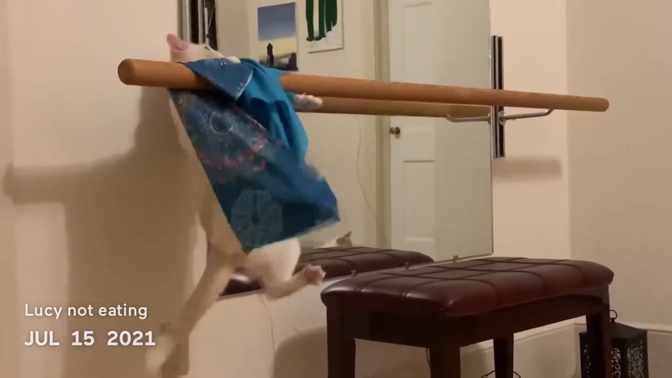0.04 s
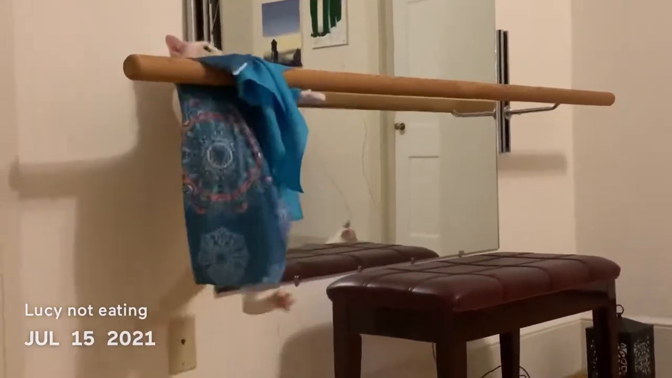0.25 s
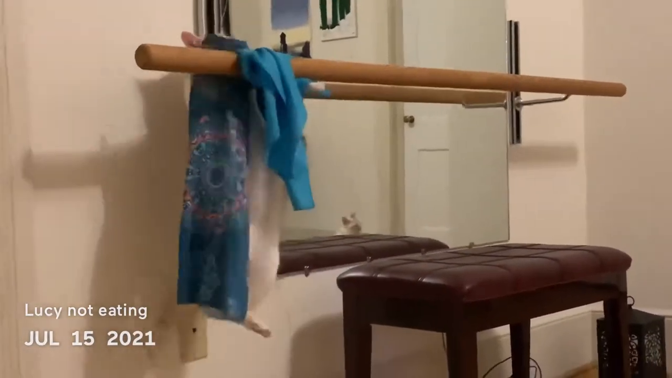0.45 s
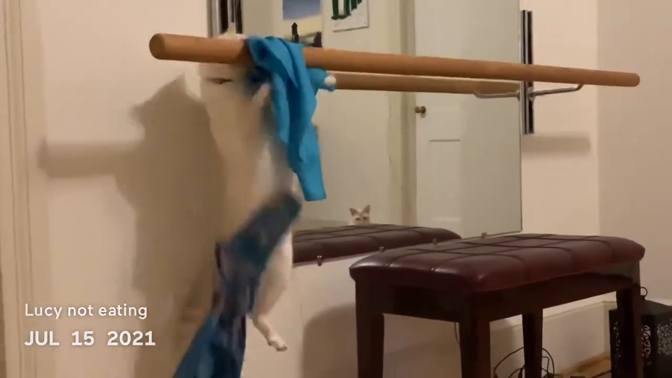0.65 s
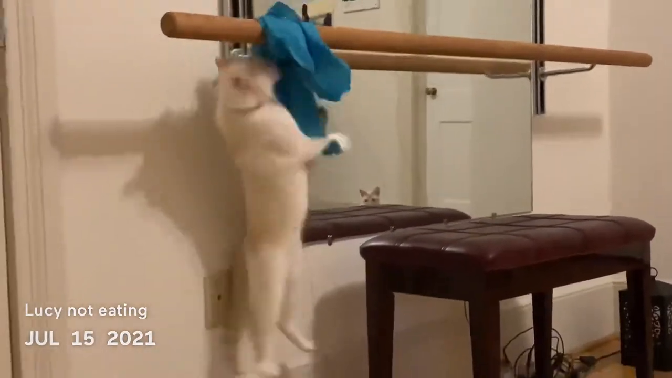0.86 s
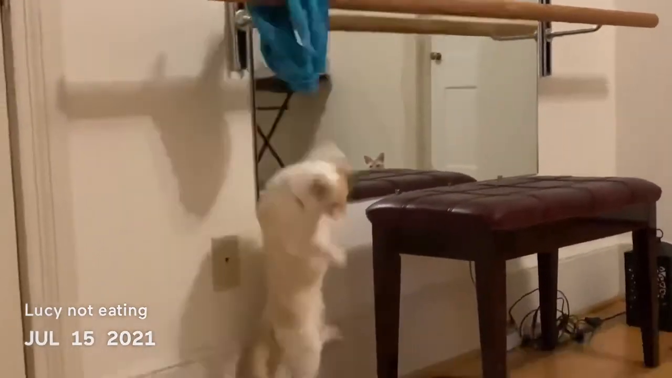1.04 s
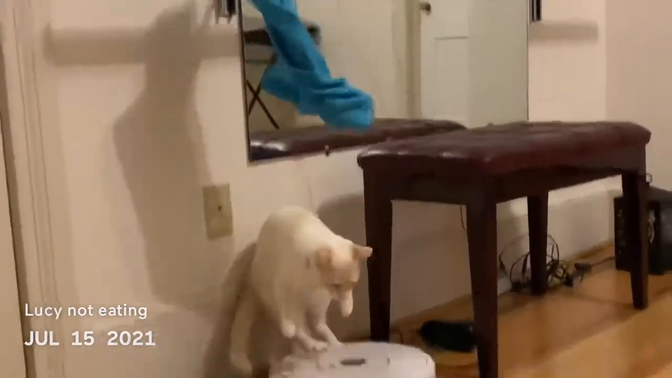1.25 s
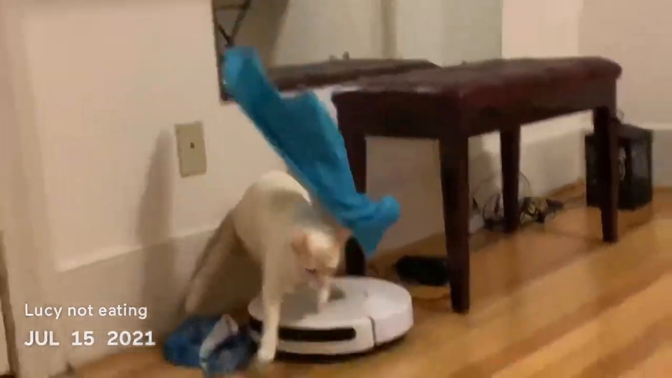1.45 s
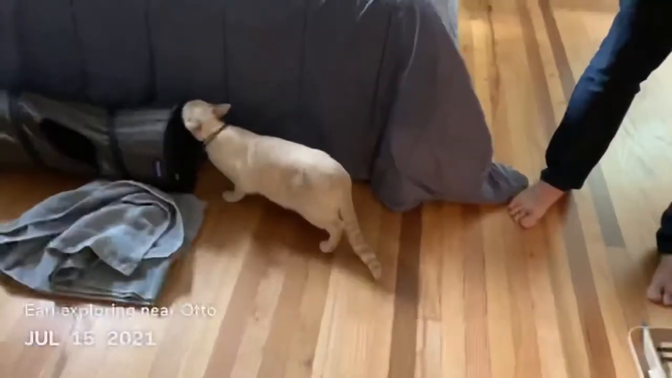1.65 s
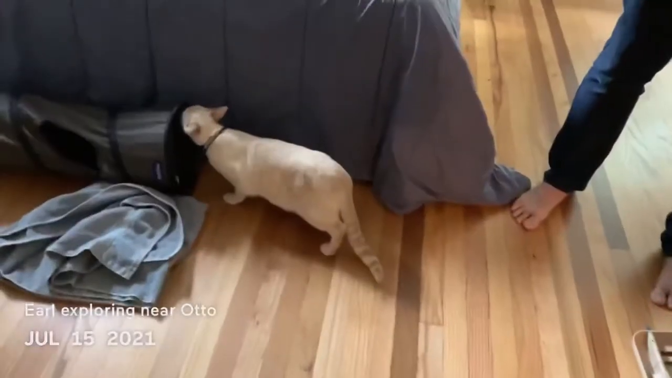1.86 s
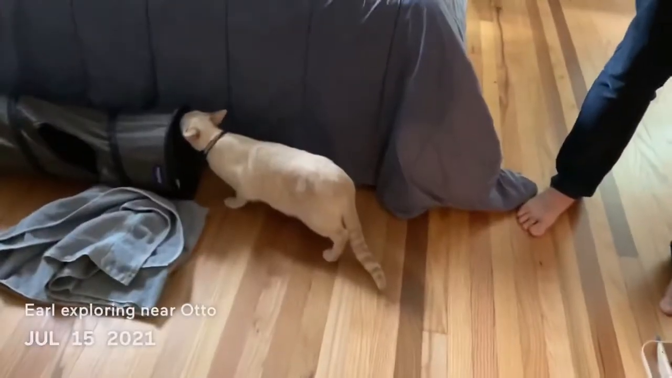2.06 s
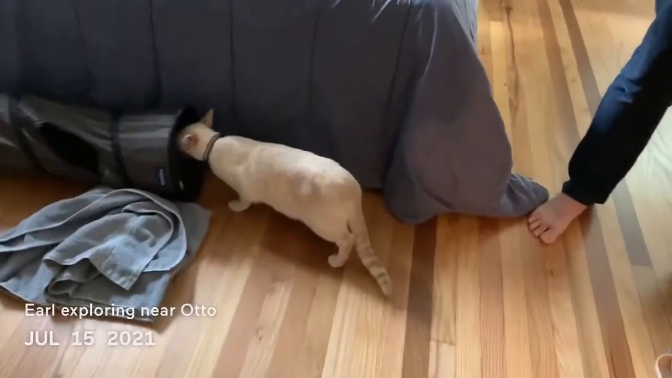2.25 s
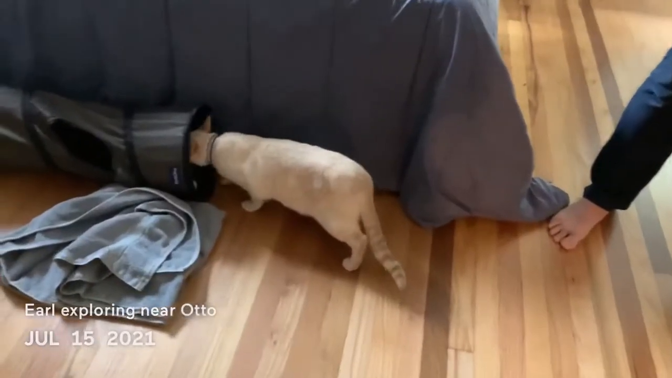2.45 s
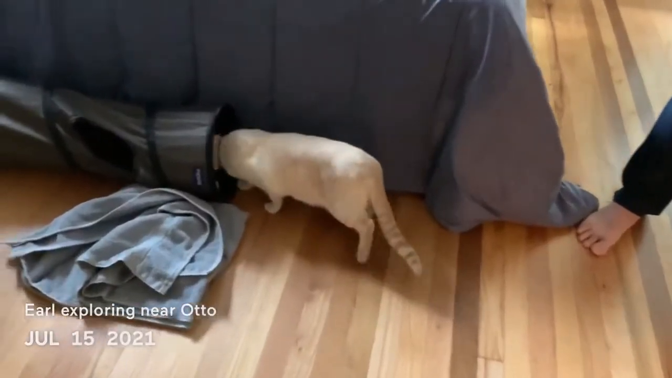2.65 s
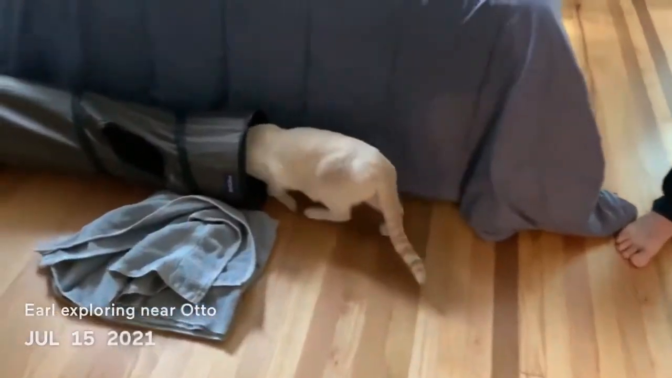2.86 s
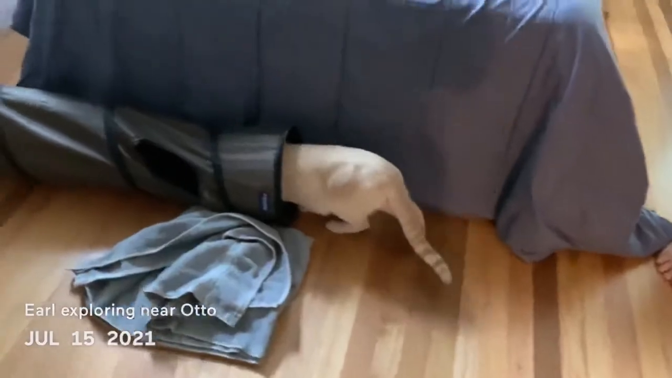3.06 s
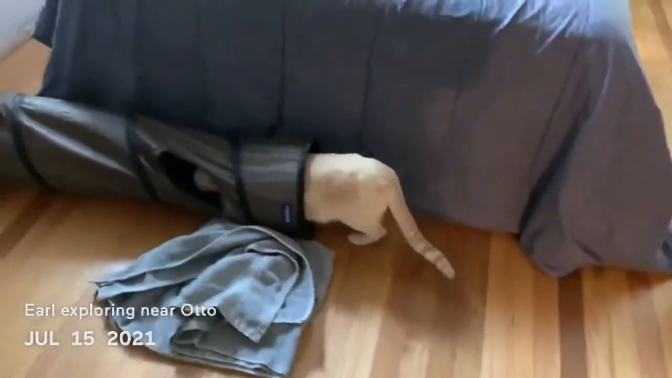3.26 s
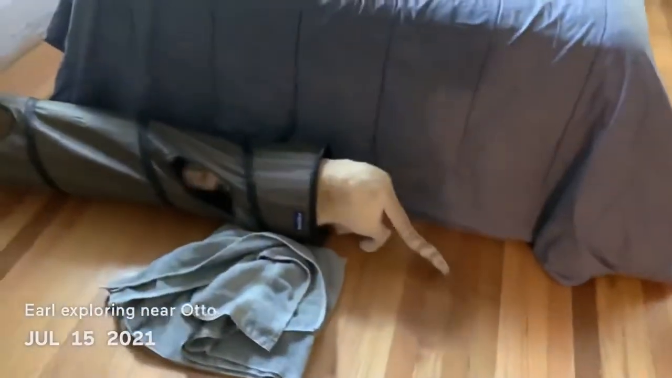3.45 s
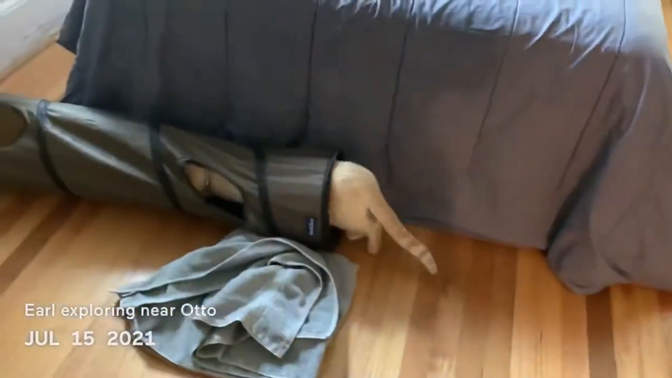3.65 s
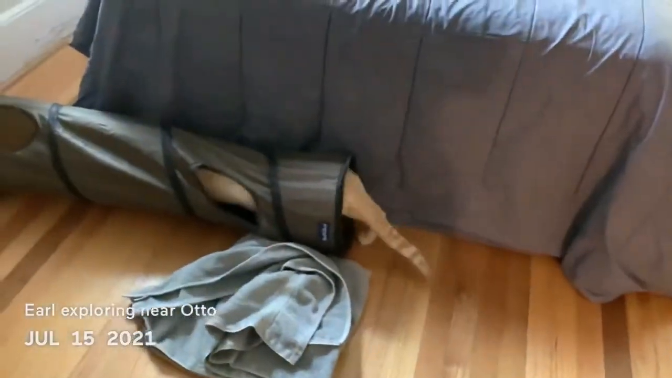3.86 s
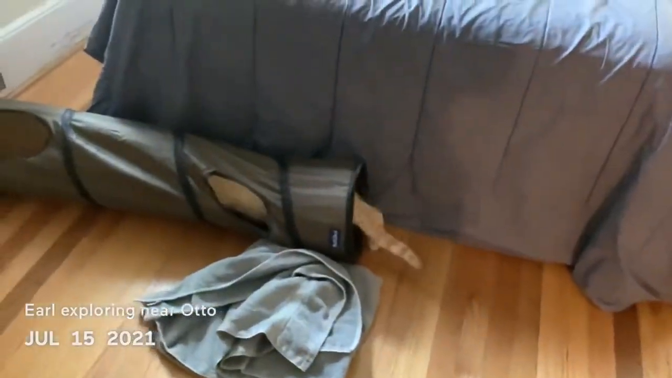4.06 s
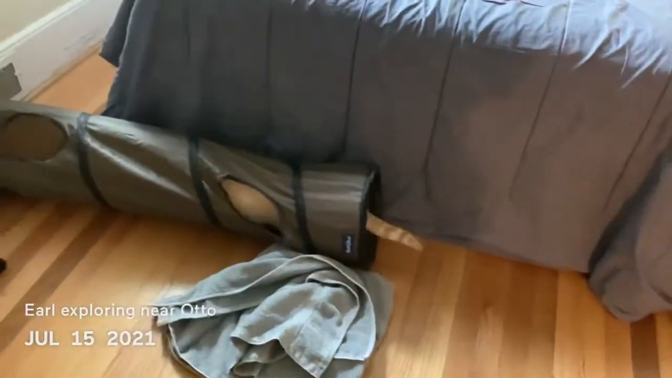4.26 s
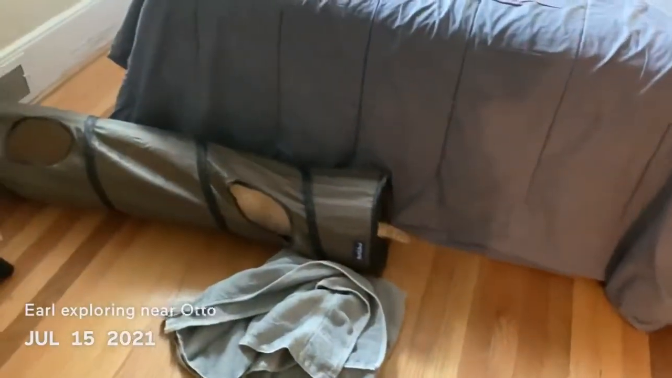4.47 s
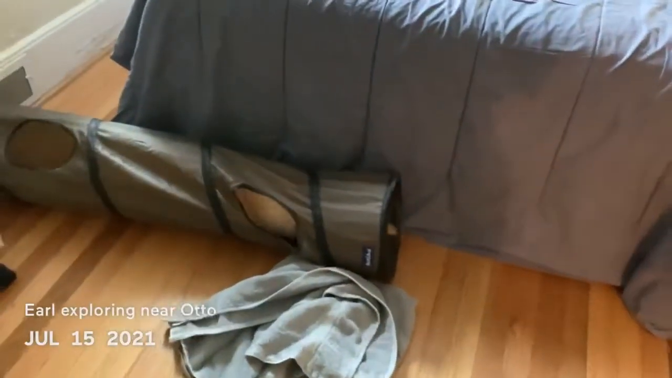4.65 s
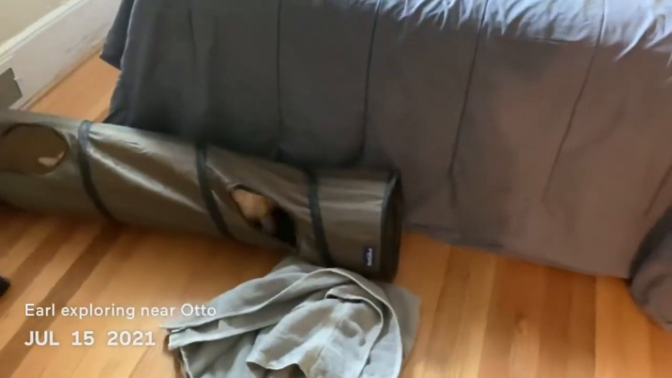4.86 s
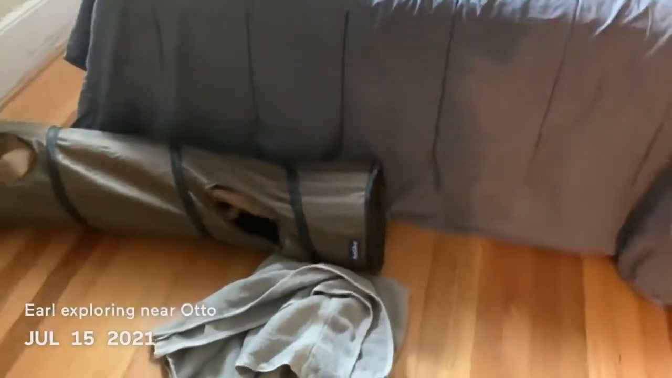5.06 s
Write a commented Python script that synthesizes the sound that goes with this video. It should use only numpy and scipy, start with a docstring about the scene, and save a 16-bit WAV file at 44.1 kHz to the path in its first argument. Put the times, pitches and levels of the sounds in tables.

```python
"""Two rooms indoors, in stereo, over faint steady air. In the first, a cat hangs from a wooden bar:
the bar shakes under its tugs, a cloth rubs off it, claws drag and strike wood and wall, and the paws
land on a hollow plastic case built from decaying sines. A fade leads to the quieter second room, where
a cat creeps into a crinkly fabric tunnel (filtered noise and short bursts of slips) and meows inside:
gliding harmonics with rasp and breath, heard at a distance, with more room than direct sound."""
import sys
import numpy as np
from scipy import signal
from scipy.fft import rfft, irfft, next_fast_len
from scipy.io import wavfile

SR = 44100
rng = np.random.default_rng(int(sys.argv[2]) if len(sys.argv) > 2 else 0)


def transcribe(signal):
    """Save signal, clipped to [-1, 1], as a 16-bit WAV file at the path in sys.argv[1]."""
    frames = np.atleast_2d(signal).T
    limited = np.clip(frames, -1, 1)
    pcm = np.round(limited * 32767).astype(np.int16)
    wavfile.write(sys.argv[1], SR, pcm)


N = 225306
TIME = np.arange(N) / SR  # s


def amp(db):
    """Decibels to gain."""
    return 10 ** (np.asarray(db) / 20)


def unit(x):
    """Scales to rms 1."""
    return x / np.sqrt(np.mean(x ** 2) + 1e-20)


def read(points, hz):
    """Reads a table of (f/Hz, value) on a log-frequency axis."""
    f, value = np.transpose(points)
    return np.interp(np.log(hz + 1), np.log(f + 1), value)


def add(mix, s, sound):
    """Mixes a stereo sound in at time s."""
    part = mix[:, max(round(s * SR), 0):][:, :sound.shape[1]]
    part += sound[:, :part.shape[1]]


def colour(x, spectrum, size=4096):
    """Causal (minimum-phase) filter with the given spectrum."""
    log_gain = np.log(amp(read(spectrum, abs(np.fft.fftfreq(size, 1 / SR)))))
    minimum_phase = np.exp(np.conj(signal.hilbert(log_gain)))
    taps = np.fft.ifft(minimum_phase).real[:size // 2]
    return signal.fftconvolve(x, taps[None], axes=1)[:, :x.shape[1]]


def resonate(x, hz, sharpness):
    """Passes only a narrow resonance at hz."""
    return signal.lfilter(*signal.iirpeak(hz, sharpness, fs=SR), x)


def drift(rate_hz):
    """Slow random motion of rms 1."""
    hz = np.fft.rfftfreq(N, 1 / SR)
    return unit(irfft(rfft(rng.standard_normal(N)) / (1 + (hz / rate_hz) ** 4), N))


def strokes(rows, rise_db_per_s, fall_db_per_s):
    """Gain over time of strokes: each swells up to its start, holds for its length, and dies away."""
    power = np.zeros(N)
    for s, length, db in rows:
        before_db = rise_db_per_s * np.maximum(s - TIME, 0)
        after_db = fall_db_per_s * np.maximum(TIME - s - length, 0)
        power += amp(db - np.minimum(before_db + after_db, 120)) ** 2
    return np.sqrt(power)


# how alike diffuse sound is at the left and right ear: f/Hz, likeness
EAR_LIKENESS = [(130, 0.92), (290, 0.67), (640, 0.035), (15000, 0.066)]


def diffuse(count):
    """Noise arriving from all sides: alike in both ears only in the bass."""
    size = next_fast_len(count)
    a, b = rfft(rng.standard_normal((2, size)))
    same = np.clip(read(EAR_LIKENESS, np.fft.rfftfreq(size, 1 / SR)), -1, 1)
    return irfft([a, same * a + np.sqrt(1 - same ** 2) * b], size)[:, :count]


# reverberation time at damping 1: f/Hz, t60/s
ROOM_DECAY = [(100, 0.22), (400, 0.78), (2000, 0.48), (5000, 0.42), (9000, 0.31), (15000, 0.025)]


def room(wet_db, rise, direct=(1,), lag=10, damping=1):
    """Direct sound of energy 1, lag samples late at the left, and a swelling tail that decays by pitch."""
    hz, t, z = signal.stft(diffuse(SR // 2), SR, nperseg=256)
    decay = amp(-60 * damping * t / read(ROOM_DECAY, hz)[:, None])
    tail = signal.istft(z * decay, SR, nperseg=256)[1]
    tail *= 1 - np.exp(-np.arange(tail.shape[1]) / SR / rise)
    response = amp(wet_db) * tail / np.linalg.norm(tail[0])
    ears = np.array([np.pad(direct, (lag, 0)), np.pad(direct, (0, lag))])
    add(response, 0, ears / np.linalg.norm(direct))
    return response


def contact(db, spectrum, length, wet_db, rise, ring_hz=None, ring_db=4, ring_s=.022, sharpness=5,
            first=1, lag=10):
    """A quick run of slips, coloured by what is touched and spread by the room; db is for about 30 ms."""
    t = np.arange(SR // 16) / SR
    slips = rng.choice([-1, 1], len(t)) * np.exp(-t / max(length, 1 / SR))
    slips[0] *= first  # above 1, the run starts with one big slip
    sound = colour(room(wet_db, rise, slips, lag), spectrum)
    if ring_hz:  # the struck spot rings briefly at a pitch of its own
        ring = resonate(sound, ring_hz, sharpness)
        sound = sound + amp(ring_db) * ring * np.exp(-np.arange(ring.shape[1]) / SR / ring_s)
    return amp(db) * sound / np.std(sound[:, :SR // 33])


def friction(spectrum, grains_per_s, spread_db, grain_db):
    """Smooth rubbing plus tiny catches of uneven size, at rms 1."""
    sizes = amp(spread_db * np.minimum(rng.exponential(1, N), 4)) * rng.choice([-1, 1], N)
    catches = sizes * (rng.random(N) < grains_per_s / SR)
    grains = signal.fftconvolve(room(wet_db=4.5, rise=0.0005), catches[None], axes=1)[:, :N]
    return unit(colour(diffuse(N) + amp(grain_db) * unit(grains), spectrum))


# spectrum of the background air: f/Hz, relative level/dB per Hz
AIR_SPECTRUM = [(25, -15), (60, 3), (200, -7), (620, -18.5), (2000, -33.5), (7000, -35), (9800, -28.5),
                (15500, -48)]


def air(level_db=-61):
    """Faint background noise from all around, steady before the fade between the rooms."""
    return amp(level_db) * unit(colour(diffuse(N), AIR_SPECTRUM))


# resonances of the wooden bar: f/Hz, width/Hz, relative level/dB
BAR_MODES = [(58, 21, 7), (117.3, 10.2, 5)]
# the cat's weight tugging at the bar: t/s, length/s, shake level/dB before the hum and judder gains
BAR_TUGS = [(.08, 0.038, -49.5), (.24, 0.083, -52), (.38, 0.036, -48.5), (.57, 0.066, -49),
            (.7, 0.012, -43), (.82, 0.18, -38.5), (1.12, 0.18, -41), (1.36, 0.049, -47)]


def bar(hum_hz=73, waver=0.58, hum_db=-1, judder_db=-3, hard_db=-42):
    """Tugs make the bar's modes judder; the harder the tug, the more a wavering hum takes over."""
    hz = np.fft.rfftfreq(N, 1 / SR)
    modes = sum(amp(db) / (1 + 2j * (hz - f) / width) ** 2 for f, width, db in BAR_MODES)
    judder = unit(irfft(rfft(diffuse(N)) * modes, N))
    hum = unit(np.sin(2 * np.pi * hum_hz * TIME + waver * drift(22.0)))
    shake = strokes(BAR_TUGS, rise_db_per_s=346, fall_db_per_s=113)
    hard = np.minimum(shake / amp(hard_db), 1)
    return shake * (amp(hum_db) * np.sqrt(hard) * hum + amp(judder_db) * (1 - hard / 2) * judder)


# spectrum of cloth rubbing on the bar: f/Hz, relative level/dB per Hz
CLOTH_SPECTRUM = [(100, -8.5), (200, -19), (400, -5), (600, -4), (2300, -8), (7000, -18.5), (15500, -36)]
# thin whine that goes with the sliding cloth: f/Hz, level/dB relative to the rubbing
CLOTH_WHINE = [(1556, -21), (2503, -15), (3523, -21)]
# pulls that drag the cloth over the bar: t/s, length/s, rubbing level/dB
CLOTH_PULLS = [(0, 0.58, -59.5), (.29, 0.068, -58)]


def cloth(waver=.6):
    """Cloth slides off in grainy friction with thin whines, their phase wavering by waver radians rms."""
    whine = 0
    for hz, db in CLOTH_WHINE:
        whine = whine + amp(db) * unit(np.sin(2 * np.pi * hz * TIME + waver * drift(33)))
    rub = friction(CLOTH_SPECTRUM, grains_per_s=1000, spread_db=2, grain_db=2.0)
    return strokes(CLOTH_PULLS, rise_db_per_s=245, fall_db_per_s=114) * (rub + whine)


# low thump of any soft contact, in both rooms: f/Hz, relative level/dB per Hz
THUMP_SPECTRUM = [(40, -15.5), (90, -2), (160, 6.5), (200, -2), (310, 0.5), (470, -10.5), (1600, -55.5)]
# the swinging body bumping against the wall: t/s, length/s, level/dB
BODY_BUMPS = [(.335, 0.02, -56), (.56, 0.016, -54)]


def bumps():
    """The soft body meets the wall: swells of dull low noise."""
    thump = unit(colour(diffuse(N), THUMP_SPECTRUM))
    return strokes(BODY_BUMPS, rise_db_per_s=302, fall_db_per_s=162) * thump


# spectrum of claws dragged on wood and wall: f/Hz, relative level/dB per Hz
CLAW_SPECTRUM = [(100, -2), (590, -8.5), (740, -11.5), (2020, -11.5), (2800, -15.5), (7000, -25.5),
                 (9300, -24.5), (15500, -41)]
# claws dragging: t/s, length/s, level/dB
CLAW_DRAGS = [(.808, 0.04, -46.5), (.995, 0.04, -40.5), (1.06, 0.007, -40.5)]


def claws():
    """Claws drag over wood and wall, catching in coarse grains."""
    scrape = friction(CLAW_SPECTRUM, grains_per_s=430, spread_db=3.5, grain_db=4.0)
    return strokes(CLAW_DRAGS, rise_db_per_s=549, fall_db_per_s=61.5) * scrape


# clack of wood: f/Hz, relative level/dB per Hz
WOOD_SPECTRUM = [(200, -17), (560, 12), (760, 1), (1100, 3), (2200, -1.5), (2900, -6), (4500, -12.5),
                 (15000, -33)]
# tick of a claw: f/Hz, relative level/dB per Hz
CLAW_TICK_SPECTRUM = [(1500, -11), (3700, -9), (4400, 3), (5200, -8.5), (6550, -0.5), (7500, -13),
                      (8750, -1.5), (11800, -15.5), (16000, -1)]
# paws striking bar and wall: t/s, clack level/dB, thump level/dB, claw tick level/dB,
# ring f/Hz, gain of the ring resonance/dB
PAW_KICKS = [(0.622, -64.5, -80, -91, 990, -3), (0.739, -47.5, -48, -84.5, 840, 16),
             (0.747, -54, -64, -78.5, 1900, -3), (0.804, -39.5, -38, -54.5, 550, 6),
             (0.975, -43, -72, -59, 1500, 5), (0.985, -40, -32.5, -80.5, 454, 19.5),
             (0.996, -46, -43.5, -68.5, 2500, 12.5), (1.039, -41.5, -50.5, -50.5, 2560, 10.5),
             (1.047, -38.5, -43, -52, 2100, 23), (1.063, -44.5, -51, -52, 2020, 13),
             (1.222, -70, -65, -48.5, 6600, 4), (1.328, -39.5, -54, -45.5, 2400, 8)]


def kicks():
    """Each blow joins a ringing wooden clack, a claw tick and a low thump."""
    out = np.zeros((2, N))
    for s, clack_db, thump_db, tick_db, ring_hz, ring_db in PAW_KICKS:
        clack = contact(clack_db, WOOD_SPECTRUM, length=.008, wet_db=3.5, rise=.004,
                        ring_hz=ring_hz, ring_db=ring_db, lag=4)
        tick = contact(tick_db, CLAW_TICK_SPECTRUM, length=.005, wet_db=0, rise=.004)
        thump = contact(thump_db, THUMP_SPECTRUM, length=0.015, wet_db=-2.0, rise=0.0082)
        add(out, s, clack + tick + thump)
    return out


# modes of the hollow plastic case: f/Hz, level/dB relative to the blow, t60/s
CASE_MODES = [(140, -31, 0.48), (257, -5.5, 0.21), (307.5, -1.5, 0.28), (369.5, -2.5, 0.28),
              (438.4, -3, 0.2)]
# paws landing on the case: t/s, blow level/dB
PAW_LANDINGS = [(1.335, -29), (1.36, -29.5)]


def landing(rise=0.0078, thud_db=-14.5, thud_hz=355):
    """Soft paws set the hollow case booming in decaying modes, with a dull thud below the blow level."""
    t, out = np.arange(SR // 2) / SR, np.zeros((2, N))
    for s, blow_db in PAW_LANDINGS:
        # phases in turns, slightly different in each ear
        shared_phase = rng.random((len(CASE_MODES), 1, 1))
        phases = shared_phase + 0.11 * rng.standard_normal((len(CASE_MODES), 2, 1))
        ring = 0
        for (hz, db, t60), phase in zip(CASE_MODES, phases):
            decay = np.exp(-np.log(1000) * t / t60)
            ring = ring + amp(db) * decay * np.sin(2 * np.pi * (hz * t + phase))
        add(out, s, amp(blow_db) * ring * (1 - np.exp(-t / rise)))
        thud = contact(blow_db + thud_db, THUMP_SPECTRUM, length=.014, wet_db=2, rise=.006,
                       ring_hz=thud_hz, ring_db=17, ring_s=.2, sharpness=3)
        add(out, s, thud)
    return out


# spectrum of the stiff tunnel fabric: f/Hz, relative level/dB per Hz
FABRIC_SPECTRUM = [(200, -2.5), (600, 1), (2200, -0.5), (2900, -8.5), (4500, -17), (15000, -39)]
# spectrum of the heaving tunnel wall: f/Hz, relative level/dB per Hz
HOLLOW_SPECTRUM = [(30, -16.5), (55, 8), (85, -5), (110, -3), (200, -4.5), (290, -5.5), (400, -11.5),
                   (1500, -60)]
# steps in the tunnel: t/s, length/s, wall heaving level/dB, fur brushing level/dB,
# levels before the second room's gain
TUNNEL_STEPS = [(1.643, 0.15, -61, -67.5), (2.05, 0.093, -60.5, -88), (2.24, 0.11, -51.5, -52),
                (2.666, 0.09, -48, -63.5), (2.893, 0.096, -49.5, -50.5), (3.21, 0.12, -54.5, -68.5),
                (3.433, 0.023, -52.5, -64), (3.652, 0.062, -54.5, -53.5), (3.86, 0.085, -56.5, -65),
                (4.056, 0.22, -53, -64.5), (4.743, 0.014, -50.5, -59.5), (4.815, 0.087, -57, -61)]


def tunnel(creep_heave_db=-58.5, creep_brush_db=-73, tube_hz=308, tube_db=-2):
    """At each step the fabric heaves and rubs on fur, humming the air inside; it never quite rests."""
    s, length, heave_db, brush_db = np.transpose(TUNNEL_STEPS)
    heave_steps = strokes(zip(s, length, heave_db), rise_db_per_s=190, fall_db_per_s=152)
    brush_steps = strokes(zip(s, length, brush_db), rise_db_per_s=113, fall_db_per_s=85)
    heave = np.hypot(heave_steps, amp(creep_heave_db))
    brush = np.hypot(brush_steps, amp(creep_brush_db))
    wall = unit(colour(diffuse(N), HOLLOW_SPECTRUM))
    rub = friction(FABRIC_SPECTRUM, grains_per_s=130, spread_db=6, grain_db=7)
    hum = unit(resonate(diffuse(N), tube_hz, sharpness=6))
    return heave * wall + brush * (rub + amp(tube_db) * hum)


# high tick of snapping fabric: f/Hz, relative level/dB per Hz
SNAP_TICK_SPECTRUM = [(1500, 0.5), (7000, -2.5), (11500, -3.5), (13600, 2.5), (16000, -3.5)]
# tunnel fabric snapping: t/s, clack level/dB, tick level/dB, ring f/Hz, gain of the ring resonance/dB,
# levels before the second room's gain
FABRIC_SNAPS = [(2.082, -51, -54.5, 1770, 2), (2.22, -50.5, -49.5, 1800, 3), (2.236, -51.5, -53, 1830, -4),
                (2.288, -40, -45, 1030, 7), (2.332, -48, -52, 2530, 24), (2.337, -42.5, -55, 1110, 11.5),
                (2.515, -50, -54.5, 2070, 9), (2.717, -49, -60, 3730, 12.5), (2.844, -46.5, -73, 1160, 12),
                (2.886, -57, -56, 2220, 11), (2.946, -47, -80, 680, 12), (2.961, -46, -79, 830, 13),
                (3.001, -43, -70, 2160, -6), (3.045, -45, -72, 2100, 2), (3.641, -42.5, -52.5, 2230, -1),
                (4.735, -54, -62.5, 2200, -20), (4.869, -58, -68, 2920, 24), (5.073, -62, -72, 6400, 28)]


def snaps(thump_db=-6):
    """The fabric buckles: one big slip and a run of small ones, with a tick and a thump under the clack."""
    out = np.zeros((2, N))
    for s, clack_db, tick_db, ring_hz, ring_db in FABRIC_SNAPS:
        clack = contact(clack_db, FABRIC_SPECTRUM, length=.0035, wet_db=-0.5, rise=.004,
                        ring_hz=ring_hz, ring_db=ring_db, first=2, lag=5)
        tick = contact(tick_db, SNAP_TICK_SPECTRUM, length=.0028, wet_db=-2, rise=.003)
        thump = contact(clack_db + thump_db, THUMP_SPECTRUM, length=0.00065, wet_db=17.0, rise=0.0068)
        add(out, s, clack + tick + thump)
    return out


# the meow: t/s, pitch f/Hz, effort/dB (before throat, room and output gains), mouth opening 0-1
MEOW_GLIDE = [(4.03, 450, -71, 0), (4.08, 540, -63, 0), (4.125, 608, -61, .25), (4.16, 617, -58, .45),
              (4.21, 630, -62, .7), (4.255, 639, -58.5, .9), (4.34, 628, -57, .9), (4.41, 616, -58, .7),
              (4.46, 589, -59.5, .1), (4.53, 584, -60.5, 0), (4.61, 520, -79, 0)]
# where the voice catches and every second cycle weakens: t/s, spread/s, added hoarseness
VOICE_CRACKS = [(4.11, 0.04, 0.75), (4.409, 0.009, 0.6), (4.58, 0.035, 0.6)]
# level of the partials through the throat: f/Hz, relative level/dB
THROAT_SPECTRUM = [(600, -1), (1230, -2), (1900, -8.5), (2520, -7.5), (3000, -22), (3850, -20), (4450, -5),
                   (5400, -42), (6350, -15), (7200, -38)]
# air rushing through the hoarse voice: f/Hz, relative level/dB per Hz
HUSK_SPECTRUM = [(400, -18), (1000, -16), (1500, -9), (2600, -18), (6000, -9)]
HOARSE_OPEN, HOARSE_SHUT = .08, .25  # by mouth opening, before the cracks add to it
VOICED_S, VOICING_S, ONSET_DB = 4.13, 0.05, -13  # the upper partials come in as the voice takes hold
FUNDAMENTAL_SHUT_DB = -4  # the lowest partial weakens as the mouth shuts
HUSK_DB, PARTIALS_WAVER_DB = -12, 1.5  # rush of air before hoarseness scales it; rms of each partial's waver
OPPOSED_HZ, OPPOSED_DB = 1210, -1  # centre and gain of the widened band


def meow(shut_db=-18, soft_hz=2300, bright_hz=2000, rasp_db=-2, mouth_hz=1150, sweep_hz=550,
         width_hz=300, mouth_db=6, count=12):
    """Harmonics slide up from a cracked start, brighten as the mouth opens and sink to a hoarse end."""
    s, *controls = np.transpose(MEOW_GLIDE)
    inside = (TIME > s[0]) & (TIME < s[-1])
    t = TIME[inside]
    arch, effort_db, mouth = (np.interp(t, s, control) for control in controls)
    mouth = np.clip(mouth, 0, 1)
    crack = sum(more * np.exp(-((t - at) / spread) ** 2) for at, spread, more in VOICE_CRACKS)
    hoarse = HOARSE_SHUT + (HOARSE_OPEN - HOARSE_SHUT) * mouth + crack
    # the vocal folds waver a little, and stumble where the voice is hoarse
    pitch = arch * (1 + .011 * drift(45)[inside] + .05 * hoarse * drift(130)[inside])
    turns = np.cumsum(pitch) / SR
    k = np.arange(1, count + 1)[:, None]
    muffle_db = shut_db * (1 - mouth) * np.clip((k * pitch - soft_hz) / bright_hz, 0, 2)
    muffle_db += ONSET_DB * np.clip((VOICED_S - t) / VOICING_S, 0, 1) * (k > 1)
    muffle_db += FUNDAMENTAL_SHUT_DB * (1 - mouth) * (k == 1)
    # the mouth resonance climbs from the second harmonic toward the third and back: "ee-ow"
    vowel_db = mouth_db / (1 + ((k * pitch - mouth_hz - sweep_hz * mouth) / width_hz) ** 2)
    waver_db = PARTIALS_WAVER_DB * np.array([drift(25)[inside] for _ in k])
    partials_db = read(THROAT_SPECTRUM, k * pitch) + muffle_db + vowel_db + waver_db
    voice = (amp(partials_db) * np.sin(2 * np.pi * k * turns)).sum(0)
    # uneven cycles put rasp and half-harmonics between the partials
    voice *= 1 + amp(rasp_db) * hoarse * drift(200)[inside] + crack * np.cos(np.pi * turns)
    husk = unit(colour(rng.standard_normal((1, len(t))), HUSK_SPECTRUM)[0])
    voice += amp(HUSK_DB) * hoarse ** 2 * husk
    voice *= amp(effort_db + drift(36)[inside])
    out = np.zeros((2, N))
    # the room outweighs the direct voice and smears the glide
    distance = room(wet_db=9, rise=.003, lag=18, damping=1.2)
    add(out, t[0], signal.fftconvolve(distance, voice[None], axes=1))
    # near one pitch an added opposite-phase part makes the call seem wide
    side = resonate(out[0] - out[1], OPPOSED_HZ, 2) / 2
    return (out + amp(OPPOSED_DB) * np.array([side, -side])) * amp([[-7], [-5]])


def scene():
    """Both rooms over the faint air, from the background to the call."""
    first_room = bar() + cloth() + bumps() + claws() + kicks() + landing()
    second_room = tunnel() + snaps() + meow()
    return air() + first_room + second_room


CUT_S, FADE_OUT_S, FADE_IN_S, SECOND_ROOM_DB = 1.503, 0.034, 0.16, -8.5  # from one room to the next


def record(dry, low_cut_hz=38, edge_hz=15700):
    """The microphone drops the deepest bass; one room fades out, the next in; then the treble limit."""
    low_cut = signal.butter(4, low_cut_hz, "high", fs=SR, output="sos")
    heard = signal.sosfilt(low_cut, dry)
    fade_out = np.clip((CUT_S - TIME) / FADE_OUT_S, 0, 1)
    fade_in = amp(SECOND_ROOM_DB) * np.clip((TIME - CUT_S) / FADE_IN_S, 0, 1)
    treble_limit = signal.firwin(511, edge_hz, window=("kaiser", 9), fs=SR)
    return signal.oaconvolve(heard * (fade_out + fade_in), treble_limit[None], "same")


dry = scene()
out = record(dry)
transcribe(out)
```